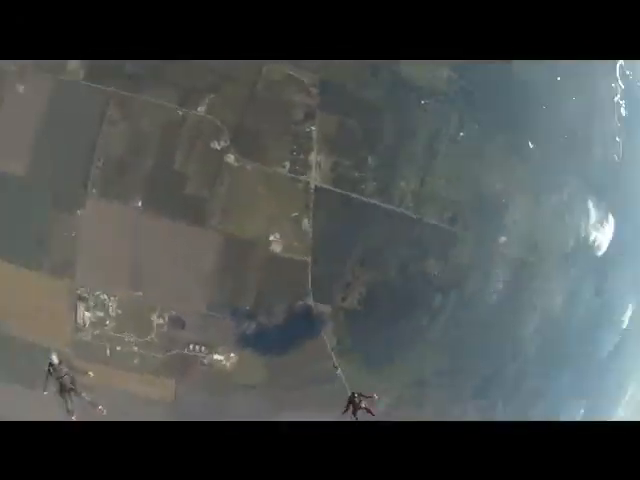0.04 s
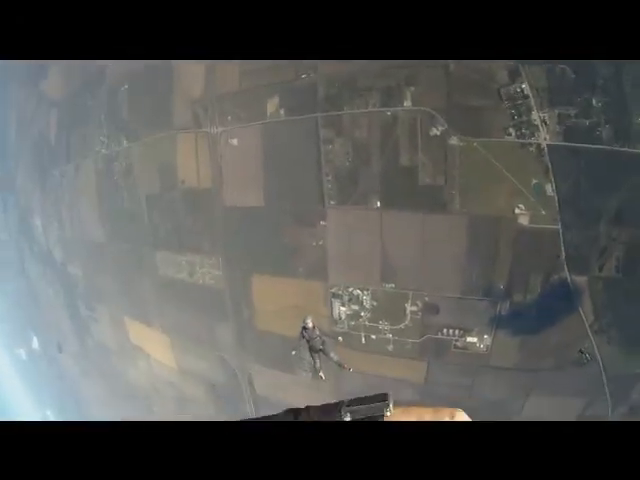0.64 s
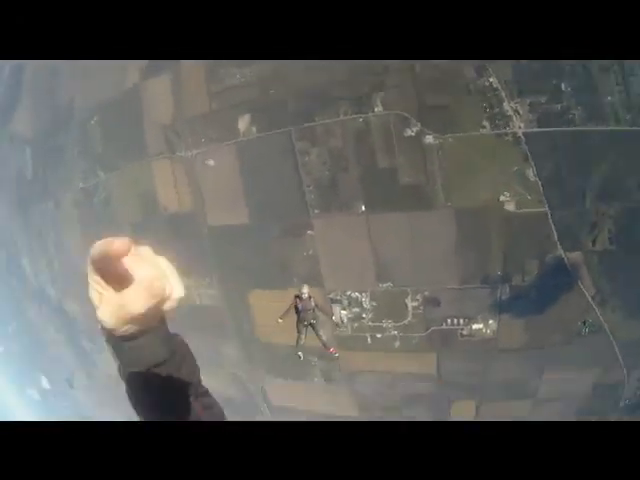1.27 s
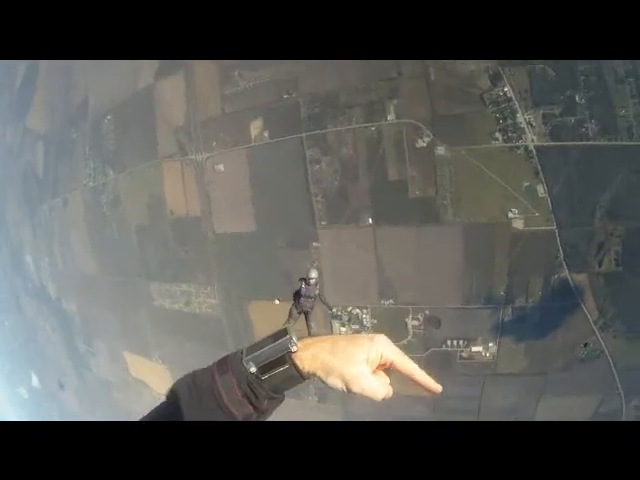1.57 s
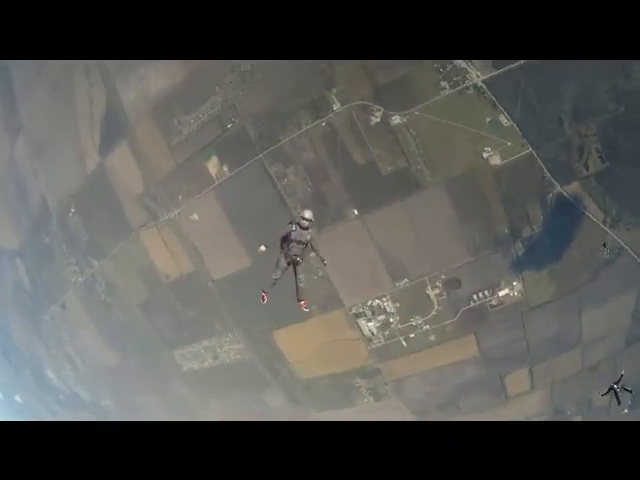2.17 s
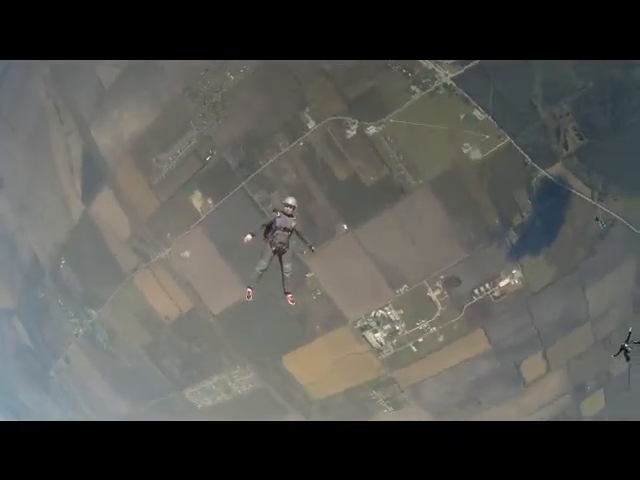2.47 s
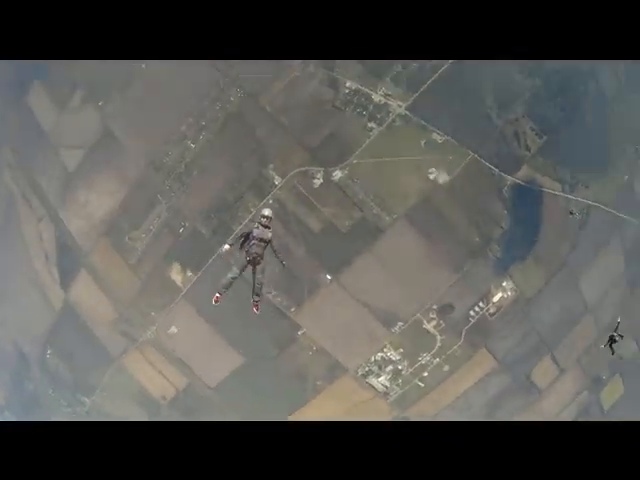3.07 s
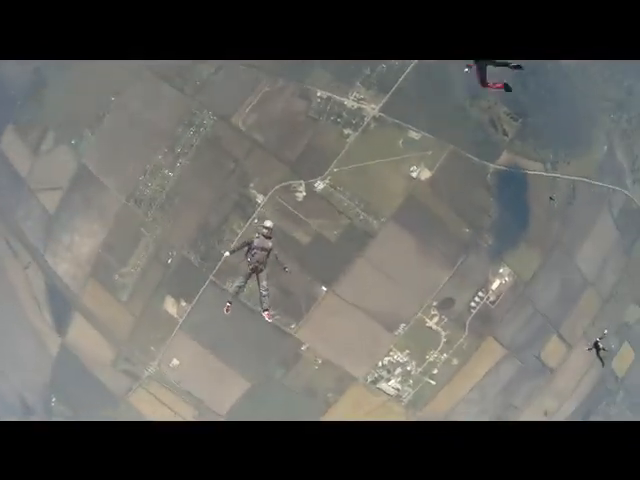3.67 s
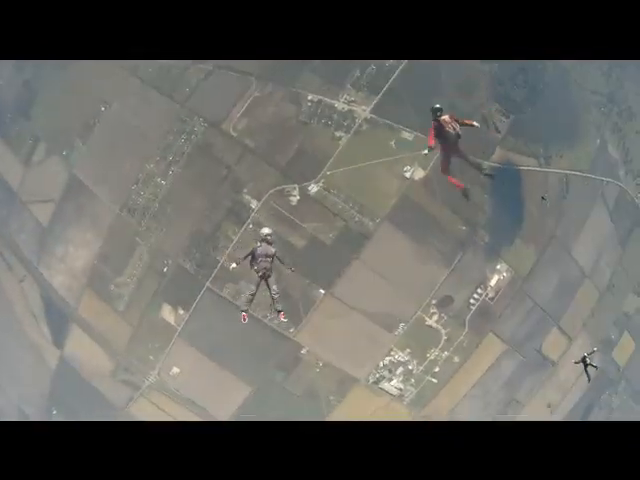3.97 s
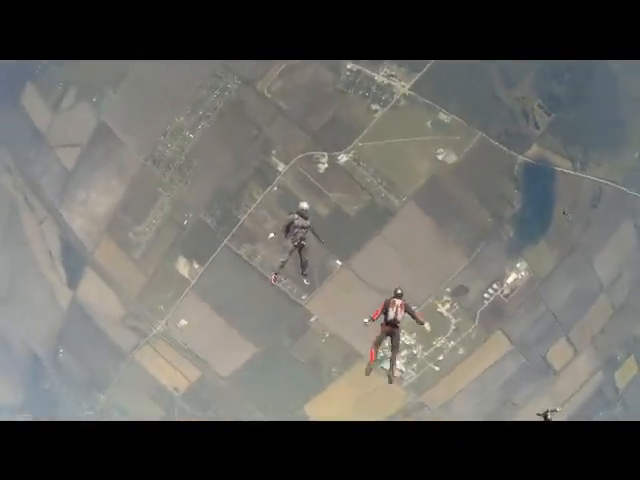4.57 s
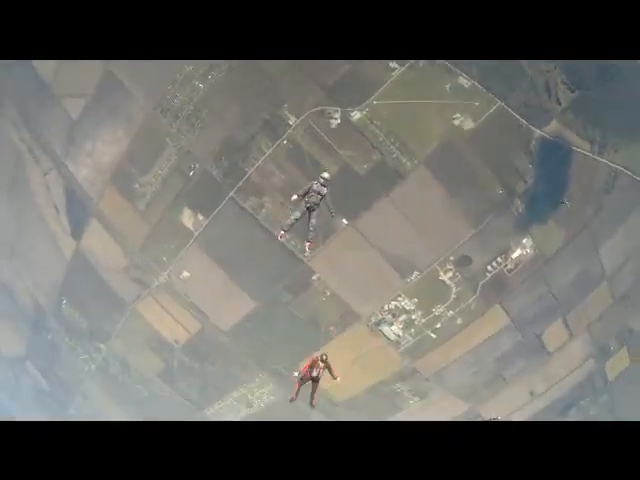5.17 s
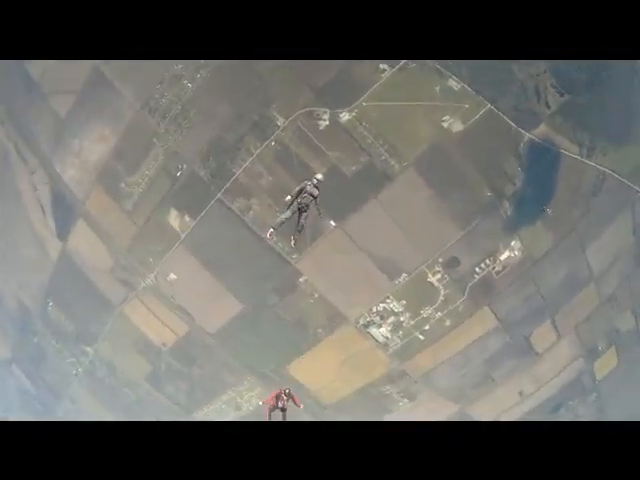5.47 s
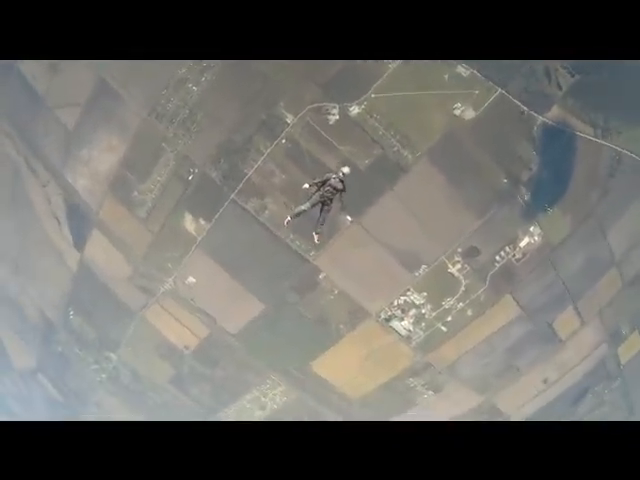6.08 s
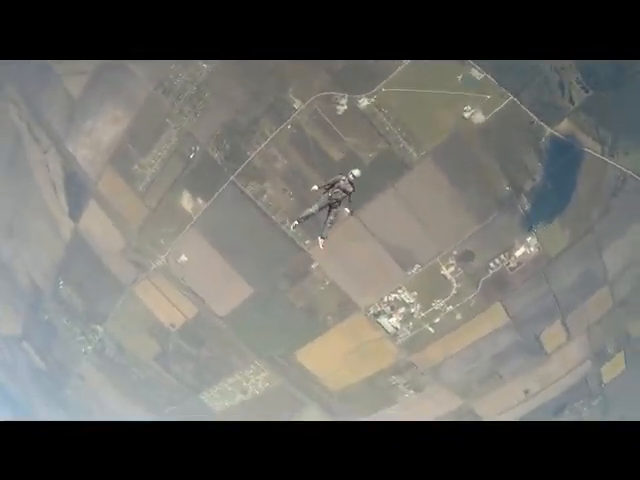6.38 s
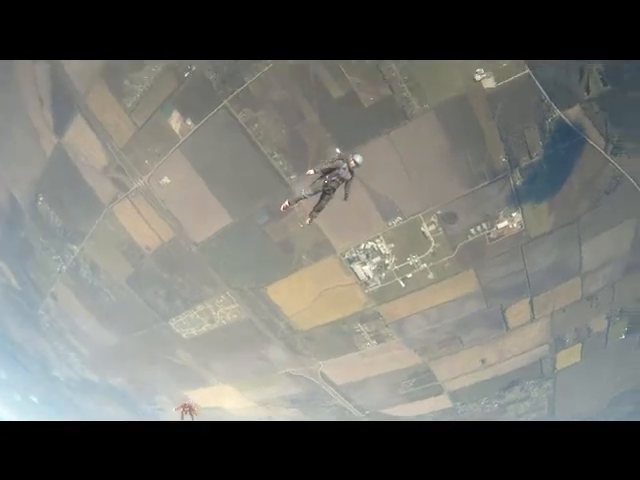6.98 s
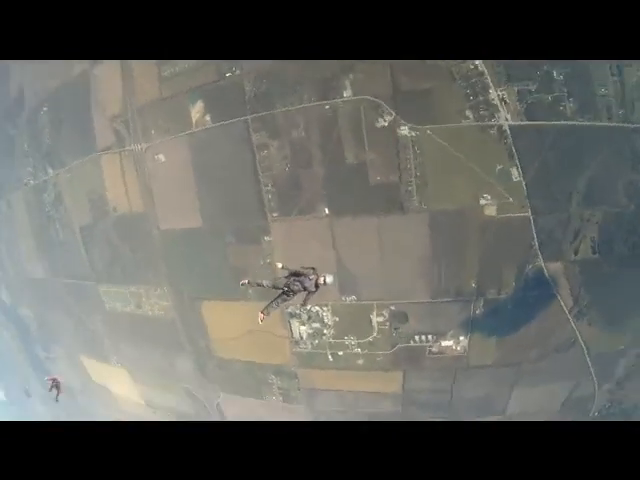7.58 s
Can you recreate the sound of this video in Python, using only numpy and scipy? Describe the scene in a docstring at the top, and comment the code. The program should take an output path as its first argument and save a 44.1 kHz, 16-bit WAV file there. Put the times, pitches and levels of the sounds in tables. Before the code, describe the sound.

Strong wind rushes and hisses steadily past a helmet microphone in freefall, with a low buffeting rumble underneath.

```python
"""In freefall, on a skydiver's helmet: air tears past a small camera.
Turbulence rushes and hisses through the case resonances; two openings sing breathily at some angles.
Large eddies buffet the case. Now and then the stream ducks abruptly and swells back."""
import sys
import numpy as np
from scipy import signal
from scipy.fft import rfft, irfft, next_fast_len
from scipy.io import wavfile
from scipy.ndimage import uniform_filter1d

SR = 44100
rng = np.random.default_rng(int(sys.argv[2]) if len(sys.argv) > 2 else 0)


def wav_record(signal):
    """Record a signal, one row per channel, as 16-bit PCM in the file named by sys.argv[1]."""
    frames = np.transpose(np.atleast_2d(signal))
    bounded = np.clip(frames, -1, 1)
    # unit amplitude maps onto the largest positive 16-bit level
    quanta = np.round(bounded * 32767).astype(np.int16)
    wavfile.write(sys.argv[1], SR, quanta)


N = 345303
TIME = np.arange(N) / SR
FFT_SIZE = next_fast_len(N)
FREQS = np.maximum(np.fft.rfftfreq(FFT_SIZE, 1 / SR), 1)

# air across the case edges as the head turns: time_s, strength_db
CROSSFLOW = [(0.0, 1.4), (0.48, -4), (0.86, 2.5), (1.16, -2.2), (1.24, 1.7), (1.4, -1), (1.62, -4),
             (1.88, 2), (2.12, -0.3), (2.28, 2.5), (3.32, -2.5), (4.2, -2), (4.28, -4), (4.72, 1.4),
             (6.34, 2.5), (6.4, 1), (7.4, 2.2), (7.82, -4)]
# wake of helmet and arm: time_s, strength_db
WAKE = [(0.0, 2.4), (0.58, -6), (0.76, 1.5), (1.9, 3.5), (2.04, 0), (2.42, 1.7), (3.0, -6), (3.12, -2),
        (4.6, -6), (5.2, -0.5), (7.44, 2.5), (7.82, -3.9)]


def airstream(case, roar_db_per_step, bright_db_per_step):
    """Fine turbulence on the case: low roar, main rush that dips as the crossflow grows, bright edge."""
    # spectra: freq_hz, gain_db
    roar_spectrum = [(300, -16), (450, -15), (680, -9), (790, -4.5), (900, 0), (1030, 2.5), (1200, -13),
                     (1600, -18), (4000, -49)]
    rush_spectrum = [(600, -31), (1000, -19.5), (1300, -5.5), (1550, -3), (2100, 0), (2400, -3),
                     (2900, -15.5), (4200, -21.5), (7500, -25.5), (9500, -14.5), (11000, -23),
                     (15000, -19.5)]
    bright_spectrum = [(1200, -21), (2100, -9.5), (2450, 0.5), (3050, -0.5), (3350, -8), (4200, -11.5),
                       (7500, -23), (9500, -9.5), (11000, -24), (15000, -18.5)]
    # level contours: time_s, offset_steps
    roar_contour = [(0.0, 0.1), (0.48, -2.5), (1.9, 0), (2.06, -3), (2.7, 1), (2.98, -2.5), (6.18, 3.5),
                    (6.56, -0.5), (6.98, 5.5), (7.36, 0.5), (7.82, 0.3)]
    bright_contour = [(0.0, -2.5), (0.24, 1.5), (0.36, -0.8), (0.62, 1.1), (0.76, -0.5), (0.96, 1.3),
                      (1.18, 1), (1.26, 1.5), (1.44, -1.5), (1.94, 2.4), (2.12, -2), (2.26, 1.8),
                      (3.36, 0.5), (6.1, 0), (6.82, -3), (7.82, 0.6)]
    # level contour: time_s, offset_db
    rush_contour = [(0, 0), (6.2, 0), (6.5, 2), (6.9, 0), (7.2, 1), (7.83, 1.8)]
    roar_db = -32.5 + roar_db_per_step * curve(roar_contour)
    rush_db = -22.5 + curve(rush_contour) - 0.14 * curve(CROSSFLOW)
    bright_db = -25.5 + bright_db_per_step * curve(bright_contour)
    roar = from_db(roar_db) * turbulence(case * colour(roar_spectrum), steady_s=0.15)
    rush = from_db(rush_db) * turbulence(case * colour(rush_spectrum), steady_s=0.054)
    bright = from_db(bright_db) * turbulence(case * colour(bright_spectrum), steady_s=0.14)
    return roar + rush + bright


def edge_hiss(case, grain_db, flutter_db):
    """Tiny vortices tear off the edges in spurts: a grainy hiss that grows with crossflow."""
    # spectrum: freq_hz, gain_db
    hiss_spectrum = [(500, -37), (1500, 1.5), (3000, 4), (4100, 1), (5400, 3.5), (7000, 0), (8200, -4),
                     (10000, -7), (15000, -35)]
    hiss_db = -29 + 1.37 * curve(CROSSFLOW)
    grain = np.minimum(drift(rate_hz=1100), 3.2)
    spurts = from_db(grain_db * grain + flutter_db * drift(rate_hz=60))
    return from_db(hiss_db) * turbulence(case * colour(hiss_spectrum), steady_s=0.21, spurts=spurts)


def air_tones(case):
    """Air across two openings: the hollow tone follows the crossflow, the upper one the wake."""
    # air resonances: freq_hz, width_hz, gain_db
    hollow_modes = [(1170, 220, 5), (1764, 170, 1), (2070, 120, -6), (2740, 78, -7.5)]
    upper_modes = [(1417, 150, 5.5), (3470, 170, -5), (4797, 88, -2.5), (7120, 140, -9.5)]
    # air meets the opening squarely: start_s, length_s, edge_s, level_db
    hollow_swells = [(0.05, 0.25, 0.027, -26), (2.72, 1.98, 0.7, -26.5), (5.2, 0.33, 0.089, -29.5),
                     (6.86, 0.2, 0.087, -29.5)]
    upper_swells = [(5.3, 1.4, 0.15, -33), (6.7, 0.8, 0.1, -29), (7.56, 0.3, 0.05, -33)]
    hollow_db = -33.5 + 0.76 * curve(CROSSFLOW)
    upper_db = -36.5 + 0.98 * curve(WAKE)
    hollow = opening(case, hollow_modes, hollow_db, hollow_swells, steady_s=0.16)
    upper = opening(case, upper_modes, upper_db, upper_swells, steady_s=0.21)
    return hollow + upper


def opening(case, modes, breath_db, swells, steady_s):
    """An air pocket resonates in turbulence; swells add to its breath in power."""
    response = sum(from_db(db) * resonance(hz, width_hz) for hz, width_hz, db in modes)
    swell_power = sum(from_db(db) ** 2 * trapezoid(*timing) for *timing, db in swells)
    level = np.sqrt(from_db(breath_db) ** 2 + swell_power)
    return level * turbulence(case * response, steady_s)


def buffeting(gust_edge_s, lull_edge_s, lull_depth_db):
    """Large eddies thump the case, smaller ones churn above them, a few land as slaps."""
    # spectra: freq_hz, gain_db
    thump_spectrum = [(10, -11), (22, -9.5), (45, -2), (65, -2.5), (90, 4), (110, -6), (140, -13.5),
                      (220, -74)]
    churn_spectrum = [(80, -11), (130, 1.5), (170, 1.5), (280, 1.5), (380, -5), (520, -5.5), (800, -52)]
    slap_spectrum = [(30, -12), (70, -3), (120, 10), (200, -6), (400, -20), (900, -1.5), (1500, -45)]
    # gusts on the case: start_s, length_s, thump_db, churn_db
    gusts = [(0.0, 0.17, -28.5, -41), (0.31, 0.12, -29.5, -53), (0.478, 0.11, -32, -48),
             (0.713, 0.15, -33, -42), (1.075, 0.18, -32, -40), (1.416, 0.12, -29.5, -39),
             (1.66, 0.13, -32, -43), (1.85, 0.14, -29.5, -44), (2.17, 0.34, -34.5, -48),
             (2.648, 0.07, -32, -46), (4.78, 0.1, -32, -45), (5.185, 0.16, -34, -41),
             (5.45, 0.09, -35, -42), (5.897, 0.3, -35, -47), (6.298, 0.11, -31.5, -43),
             (6.503, 0.2, -31.5, -40.5), (7.17, 0.37, -35, -38.5)]
    # wake leaves the case: start_s, length_s
    lulls = [(0.17, 0.16), (0.37, 0.099), (1.268, 0.13), (1.565, 0.086), (2.0, 0.12)]
    # single eddies: centre_s, width_s, level_db
    slaps = [(0.33, 0.02, -24.5), (1.086, 0.033, -25), (1.439, 0.058, -28)]
    wake_db = curve(WAKE)
    lull_db = lull_depth_db * sum(trapezoid(*timing, lull_edge_s) for timing in lulls)
    gust_thump = sum(from_db(db) * trapezoid(*timing, gust_edge_s) for *timing, db, _ in gusts)
    gust_churn = sum(from_db(db) * trapezoid(*timing, gust_edge_s) for *timing, _, db in gusts)
    thump_level = np.hypot(from_db(-36 + 0.2 * wake_db - lull_db), gust_thump)
    churn_level = np.hypot(from_db(-42 + 0.81 * wake_db - lull_db), gust_churn)
    slap_level = sum(from_db(db) * hump(TIME, centre_s, width_s) for centre_s, width_s, db in slaps)
    thump = thump_level * turbulence(colour(thump_spectrum), steady_s=0.12)
    churn = churn_level * turbulence(colour(churn_spectrum), steady_s=0.16)
    slap = slap_level * turbulence(colour(slap_spectrum), steady_s=0.02)
    return thump + churn + slap


def ducking(recover_s, small_per_s, small_step_db):
    """Stream gain: abrupt drops that swell back, a few deep among many small."""
    # deep drops: start_s, step_db
    ducks = [(0.28, 4.5), (0.854, 3), (1.371, 4.5), (1.441, 4), (1.552, 4), (1.635, 3.5), (2.024, 3),
             (2.085, 5), (3.324, 3.5), (3.841, 1), (4.606, 2.5), (4.932, 4.5), (6.365, 4), (6.821, 2.5),
             (7.204, 2.5)]
    steps_db = small_step_db * (rng.random(N) < small_per_s / SR)
    for start_s, step_db in ducks:
        steps_db[int(start_s * SR)] += step_db
    dips_db = signal.lfilter([1], [1, -np.exp(-1 / (recover_s * SR))], steps_db)
    makeup_db = uniform_filter1d(dips_db, size=6500)  # lift around each drop holds the mean level
    return from_db(makeup_db - uniform_filter1d(dips_db, size=100))


def case_response():
    """Gain per frequency: the case lifts narrow bands; the treble has dips and peaks."""
    # case resonances: freq_hz, width_hz, gain_db
    case_modes = [(896, 36, 5), (986, 55, 1.5), (1132, 153, 5.5), (1390, 75, 1), (1710, 88, 3.5),
                  (2103, 327, 7), (2780, 170, 6), (3076, 123, 5.5), (3564, 165, 6), (4440, 370, 5.5),
                  (4860, 180, 3), (5400, 240, 1), (6500, 320, 3), (7170, 200, 4.5), (7560, 290, 6.5),
                  (8400, 105, 7), (8910, 130, 4), (9180, 180, 5.5), (9980, 370, 8)]
    # treble colour, dips near 6 and 12 kHz, narrow peaks near 11 and 14 kHz: freq_hz, width_hz, gain_db
    treble_bands = [(6020, 600, -11), (10850, 240, 7), (12050, 1400, -26), (14100, 400, 8)]
    case_db = sum(db * resonance(hz, width_hz) for hz, width_hz, db in case_modes)
    treble_db = sum(db * hump(FREQS, hz, width_hz) for hz, width_hz, db in treble_bands)
    return from_db(case_db + treble_db)


def turbulence(response, steady_s, spurts=1):
    """Coloured random pressure, power held at 1 over spans longer than steady_s."""
    air = irfft(rfft(spurts * rng.standard_normal(N), FFT_SIZE) * response, FFT_SIZE)[:N]
    span = int(steady_s * SR)
    power = uniform_filter1d(uniform_filter1d(air ** 2, span), span)
    return air / np.sqrt(power + 1e-20)


def drift(rate_hz):
    """Low-passed noise, mean 0, spread 1."""
    spectrum = rfft(rng.standard_normal(FFT_SIZE)) / (1 + (FREQS / rate_hz) ** 2)
    wander = irfft(spectrum, FFT_SIZE)[:N]
    return (wander - wander.mean()) / wander.std()


def colour(points):
    """Gain per frequency from (freq_hz, gain_db) points."""
    hz, db = np.transpose(points)
    return from_db(np.interp(np.log(FREQS), np.log(hz), db))


def resonance(hz, width_hz):
    """Power response of one mode, peak 1."""
    return 1 / (1 + (2 * (FREQS - hz) / width_hz) ** 2)


def hump(axis, centre, width):
    """Gaussian, peak 1."""
    return np.exp(-(2 * (axis - centre) / width) ** 2)


def trapezoid(start_s, length_s, edge_s):
    """Rise, hold at 1, fall."""
    inside_s = np.minimum(TIME - start_s, start_s + length_s - TIME)
    return np.clip(0.5 + inside_s / edge_s, 0, 1)


def curve(points):
    """Value per sample from (time_s, value) points."""
    return np.interp(TIME, *np.transpose(points))


def from_db(db):
    return 10 ** (np.asarray(db) / 20)


def scene():
    """The ducking stream through the case, over the buffeting; mono."""
    case = case_response()
    stream = airstream(case, roar_db_per_step=1.12, bright_db_per_step=1.4)
    stream += edge_hiss(case, grain_db=3.0, flutter_db=0.5)
    stream += air_tones(case)
    stream *= ducking(recover_s=0.081, small_per_s=18, small_step_db=1.04)
    eddies = buffeting(gust_edge_s=0.025, lull_edge_s=0.02, lull_depth_db=3)
    return (stream + eddies)[None]


def record(dry):
    """Steep low-pass."""
    cutoff_hz = 15200
    return signal.sosfilt(signal.ellip(10, 0.1, 90, cutoff_hz, fs=SR, output="sos"), dry)


dry = scene()
out = record(dry)
wav_record(out)
```